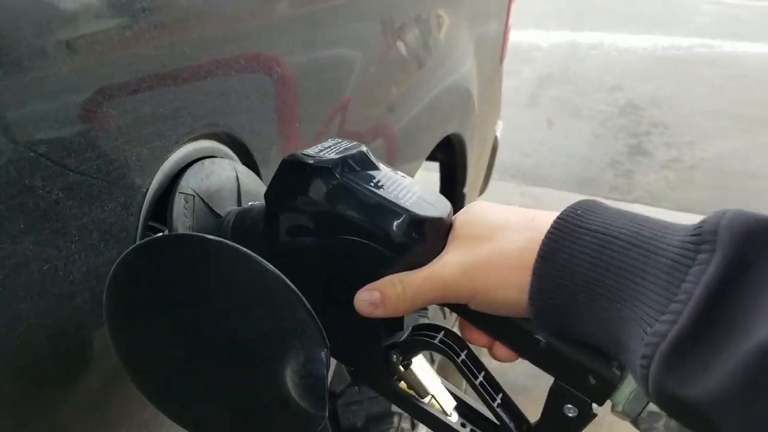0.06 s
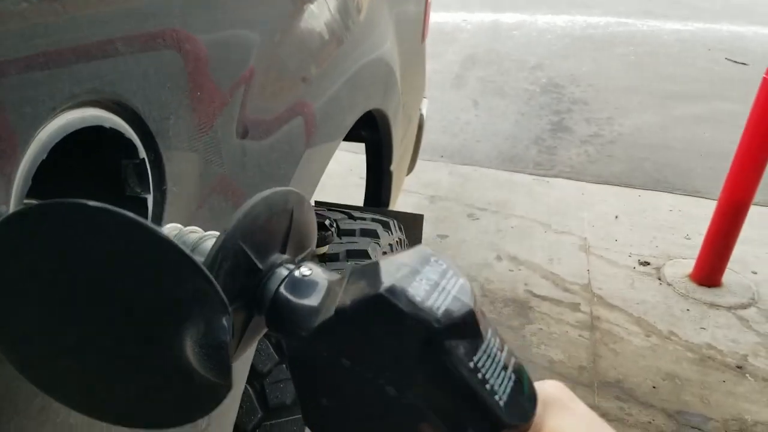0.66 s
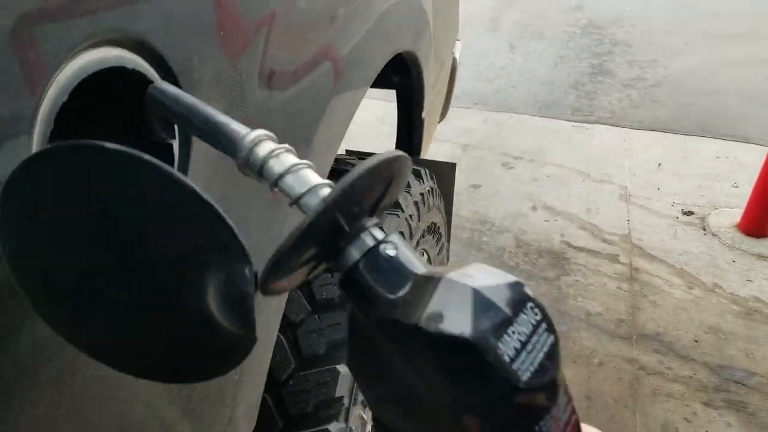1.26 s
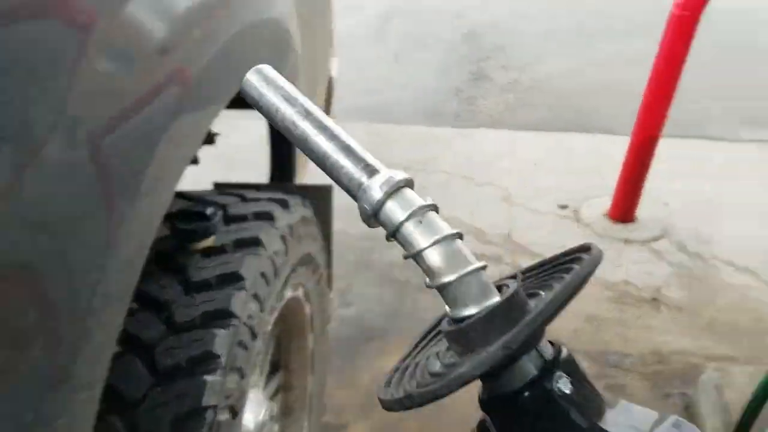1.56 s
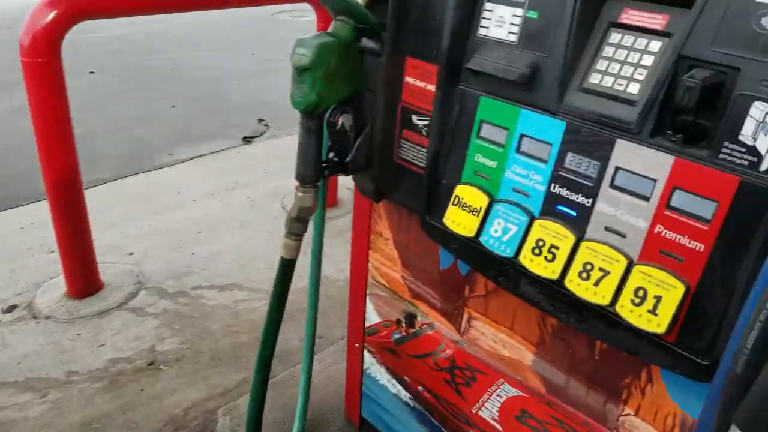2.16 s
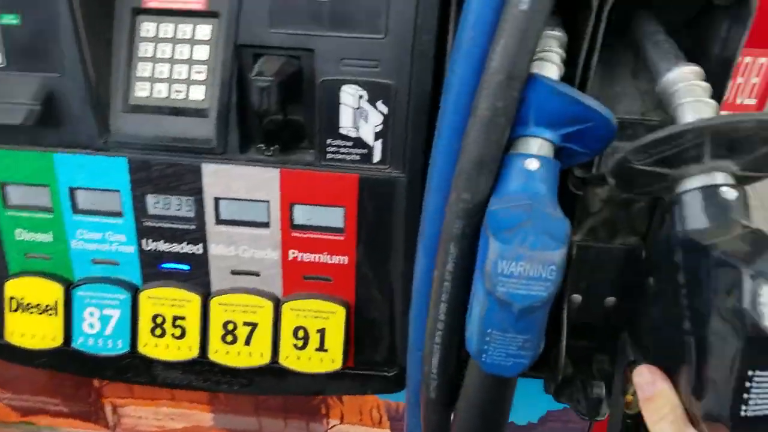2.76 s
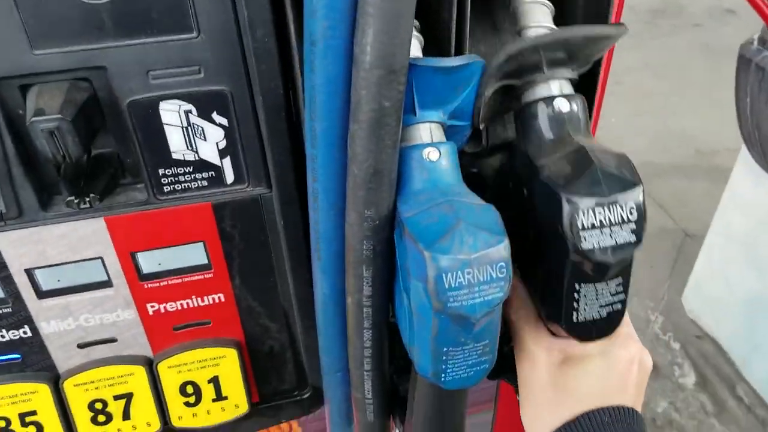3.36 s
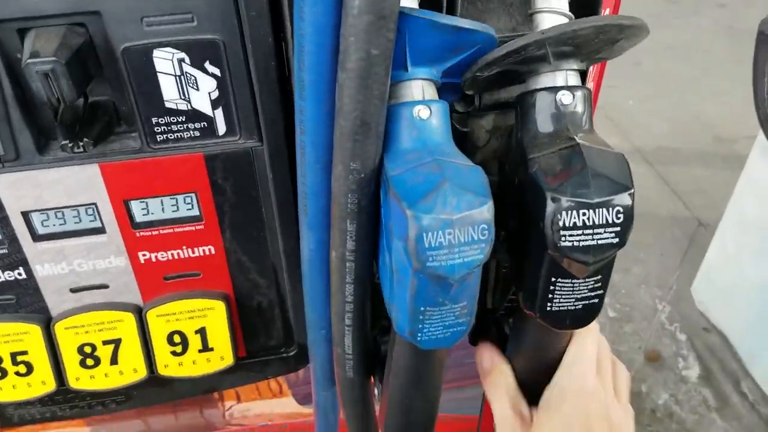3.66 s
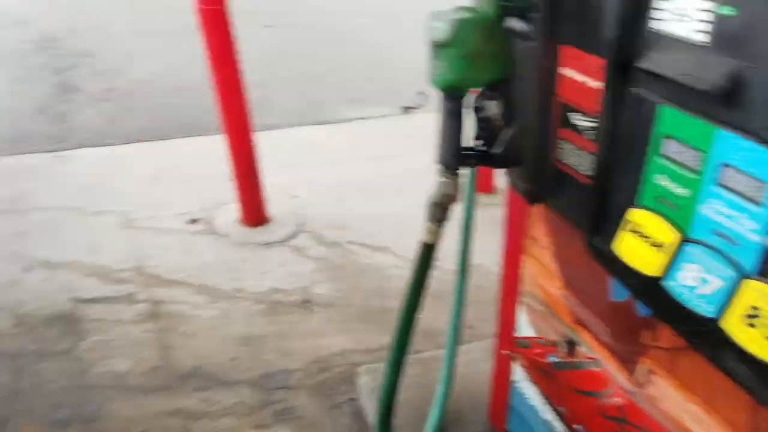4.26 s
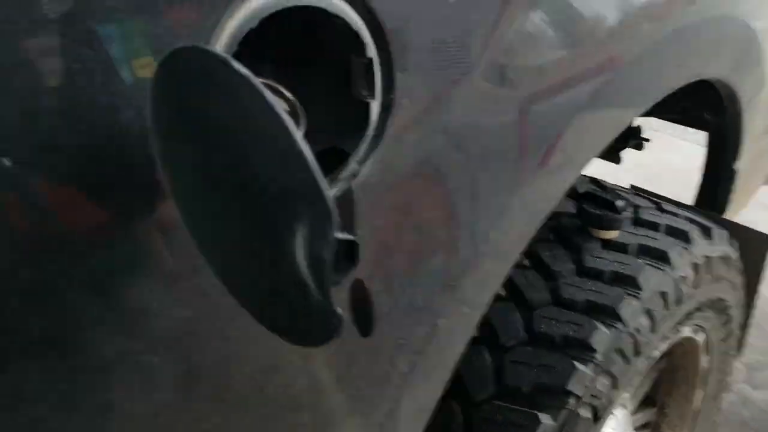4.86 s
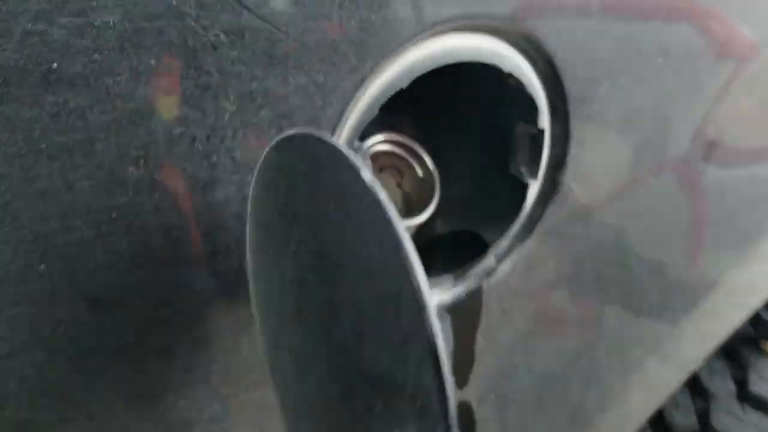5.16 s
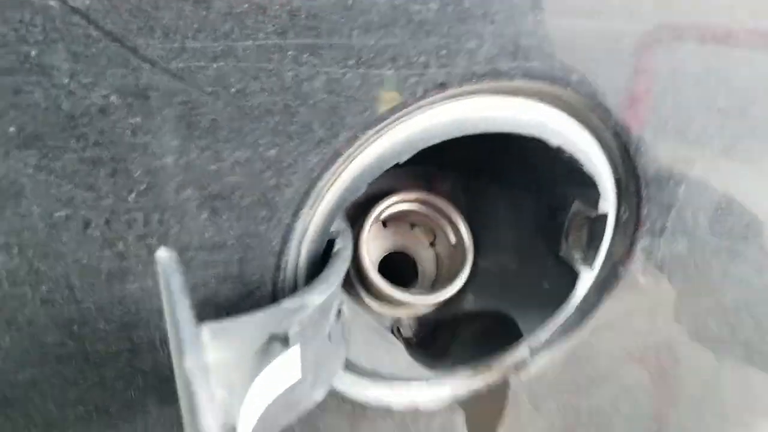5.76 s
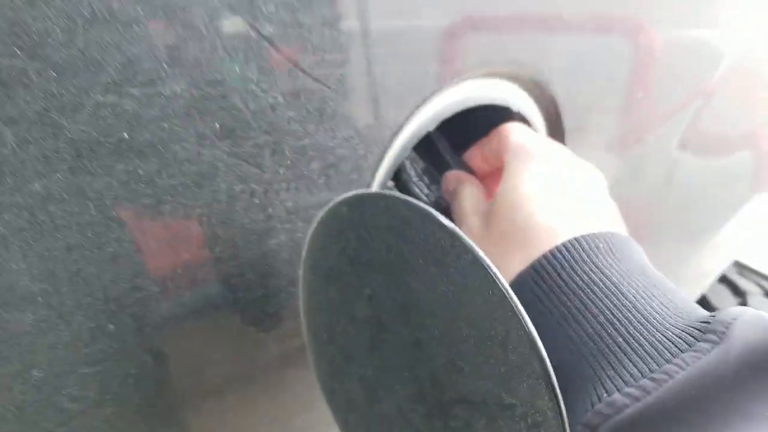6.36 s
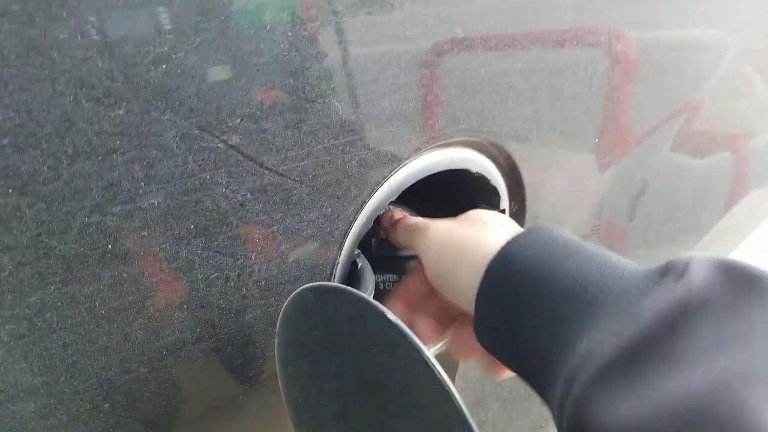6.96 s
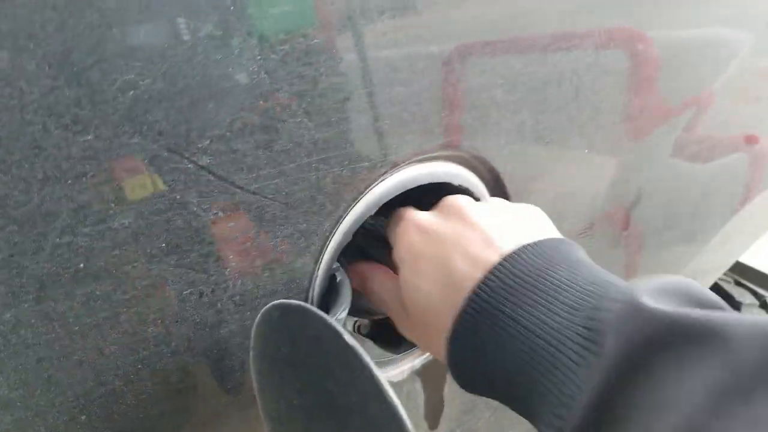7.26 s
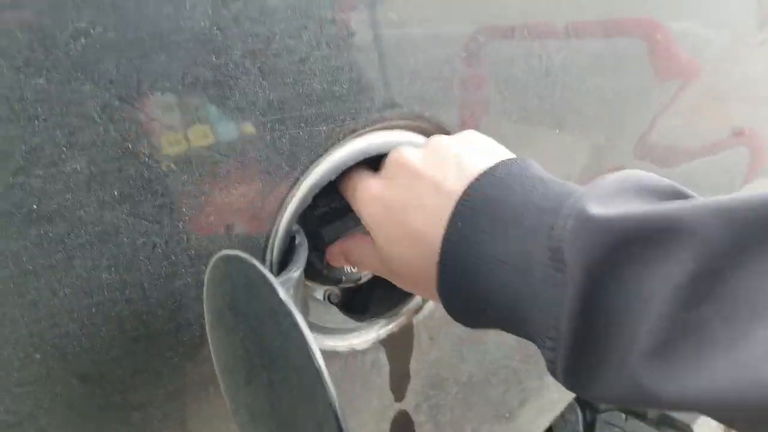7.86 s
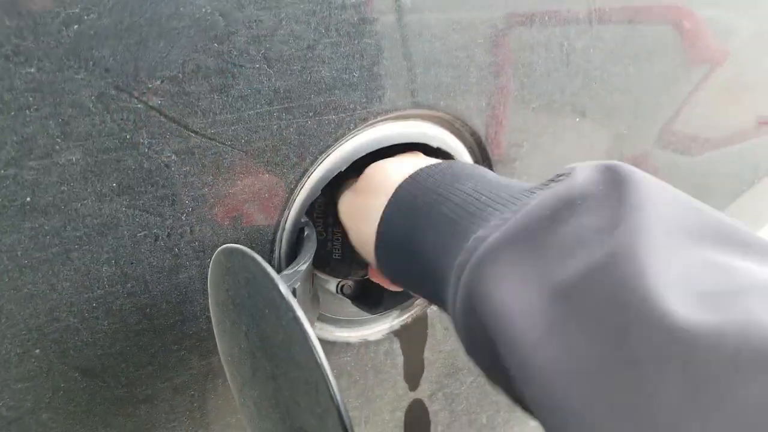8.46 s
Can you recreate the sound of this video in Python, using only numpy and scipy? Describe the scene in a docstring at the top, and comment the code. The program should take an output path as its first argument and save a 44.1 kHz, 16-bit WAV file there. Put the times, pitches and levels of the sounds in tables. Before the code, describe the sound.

A metal fuel nozzle clinks and drags out of a truck's filler neck. A couple of seconds later it clunks several times into the pump's holster, and the cabinet booms. After a few faint, distant squeaks, a hollow plastic cap knocks onto the neck and ticks along its thread. The handling is close, with a short echo from the station canopy, over idling engines and road traffic.

```python
"""A fuel nozzle knocks and drags its way out of a truck's filler neck, and a low drone passes by.
Around three seconds in, the nozzle clunks into the pump's holster and the cabinet booms.
Something squeaks far off; then the plastic fuel cap is seated and ticks along its thread.
Each blow is a crack, a clatter and a few ringing modes, echoed by the forecourt canopy.
Throughout, two engines idle over a wash of road traffic, a high whirr and a faint machine whine."""
import sys
import numpy as np
from scipy import signal
from scipy.fft import rfft, irfft, next_fast_len
from scipy.io import wavfile
from scipy.ndimage import map_coordinates

SR = 44100
rng = np.random.default_rng(int(sys.argv[2]) if len(sys.argv) > 2 else 0)


def int16_out(signal):
    """Quantize to a 16-bit WAV file."""
    q = np.round(np.clip(np.atleast_2d(signal).T, -1, 1) * 32767)
    wavfile.write(sys.argv[1], SR, q.astype(np.int16))


N = 384552

# the spout catches on the neck: start_s, level_db, hardness_db, favoured_hz
SPOUT_HITS = [(0.059, -33, 1.5, 4000), (0.249, -24, 2.5, 5800), (0.253, -28.5, -3, 2510),
              (0.286, -31, -3, 2800), (0.364, -29, 0, 5450), (0.388, -31, -4.5, 2670),
              (0.881, -34.5, 2.5, 918), (0.95, -38, 2.5, 3220)]
# its ring: pitch_hz, level_db, t60_s
SPOUT_MODES = [(248, -5, 0.13), (421, -7, 0.061), (806, -3, .1), (890, 4, 0.093), (2070, -4, 0.15),
               (2740, -3.5, 0.063), (3270, -3.5, 0.038), (3900, -8.5, 0.073), (4040, -10.5, 0.09),
               (4400, -5, .08), (5660, -4.5, 0.02), (6340, -11, .04), (7100, 0.5, .04), (7400, 0.5, 0.039),
               (11400, -9, .03), (12700, -8, .03), (13600, -8.5, 0.033)]
# EQ of its clatter: freq_hz, gain_db
SPOUT_EQ = [(59, -31), (100, 10.5), (210, 0.5), (547, -16), (910, -12.5), (1480, -14), (2130, -14.5),
            (4110, -18), (5530, -17), (6700, -27.5), (7450, -22.5), (8640, -30), (13200, -20),
            (16000, -24.5)]
# two pulls through the hollow neck: start_s, level_db
DRAG_PULLS = [(0.255, -31), (0.375, -30)]
# EQ of the drag: freq_hz, gain_db
DRAG_EQ = [(100, -14.5), (220, 1), (430, -2.5), (600, -7), (1200, -19.5), (4000, -49)]
# pan of knocks and drag: freq_hz, left_minus_right_db
SPOUT_PAN = [(60, -3.5), (240, 1), (950, 1), (3770, 6), (15000, 14.5)]
def spout(drag_t60_s=0.48, drag_attack_s=0.017):
    """The spout and its coiled spring catch on the rim of the filler neck and drag out of it."""
    knocks = contacts(SPOUT_HITS, SPOUT_EQ, SPOUT_MODES,
                      band_t60_s=[0.18, 0.12, 0.12, 0.08, 0.069], band_db=[2, -8.5, -6, -1.5, -11.6],
                      ring_db=0, favour_db=19.5, crack_db=0.5, crack_t60_s=0.0048, pressing=0.61)
    pulls = sum(amp(db) * decay(since(s), drag_t60_s, drag_attack_s) for s, db in DRAG_PULLS)
    drag = pulls * amp(3 * wobble(60)) * noise(DRAG_EQ, CLOSE_WIDTH)
    return panned(knocks + drag, SPOUT_PAN)


# the nozzle bumps into the holster: start_s, level_db, hardness_db, favoured_hz
HOLSTER_HITS = [(2.67, -25, -1.5, 7020), (2.701, -30, -7, 455), (2.948, -24, -4.5, 389),
                (2.959, -21, 5, 1730), (3.021, -17.5, 2, 2530), (3.038, -17.5, 1, 1730),
                (3.185, -31.5, -1, 2740), (3.246, -32.5, -2.5, 1840), (3.338, -16.5, -3.5, 1790),
                (3.35, -21, 1, 2900), (3.385, -14.5, -2, 993), (3.396, -19, 0, 389),
                (3.416, -21.5, 5, 2380)]
# its ring: pitch_hz, level_db, t60_s
NOZZLE_MODES = [(130, 3, 0.052), (198, 6, 0.043), (330.4, -2.5, 0.13), (390, 5, .13), (458, 1, 0.1),
                (778, -7.5, .05), (938, -5, 0.053), (1092, -0.5, 0.036), (1257, -7.5, 0.05),
                (1730, -4.5, 0.032), (2120, -5, .06), (2383, -0.5, 0.042), (2910, -2, 0.042),
                (3760, -16.5, .05), (3940, -7, 0.044), (5179, -13.5, 0.041), (6960, -11, .04)]
# EQ of its clatter: freq_hz, gain_db
NOZZLE_EQ = [(53, -31), (90, 3.5), (201, -9.5), (290, 0), (393, -0.5), (606, -16.5), (998, -26.5),
             (1440, -24.5), (2380, -19.5), (2650, -29), (2950, -21), (6030, -27), (8530, -43), (12600, -32),
             (16000, -34)]
# its weight lands on the cabinet panels: start_s, pitch_hz, level_db, t60_s
CABINET_BOOMS = [(3.021, 126, -4, 0.11), (3.022, 190.3, 3.5, 0.058), (3.399, 83.8, -2, 0.19)]
# pan of knocks and booms: freq_hz, left_minus_right_db
NOZZLE_PAN = [(60, 4), (180, -1), (550, -1), (1650, 0), (4970, 3.5), (15000, 8.5)]
def holster():
    """The heavy nozzle bumps into the pump's boot, then drops onto its rest, and the cabinet booms."""
    knocks = contacts(HOLSTER_HITS, NOZZLE_EQ, NOZZLE_MODES,
                      band_t60_s=[0.069, 0.065, 0.062, 0.04, 0.038], band_db=[-6.5, 0.5, -3, -2.5, -18],
                      ring_db=3, favour_db=16, crack_db=-3.5, crack_t60_s=0.0059)
    for start_s, hz, db, t60_s in CABINET_BOOMS:
        t = since(start_s)
        knocks += amp(db) * decay(t, t60_s, attack_s=0.0011) * np.sin(2 * np.pi * hz * t)
    return panned(knocks, NOZZLE_PAN)


# the cap knocks and ticks on the neck: start_s, level_db, hardness_db
CAP_HITS = [(6.262, -29, 1.5), (6.296, -29, -2), (6.319, -18, -3.5), (6.539, -24.5, -4), (6.816, -24.5, -3),
            (6.892, -23.5, -1), (6.899, -13, -1), (7.046, -24, -0.5), (7.306, -30.5, -6),
            (7.342, -38.5, 14.5), (7.402, -41, 9.5), (7.481, -34, 3), (7.493, -34, 6.5), (7.909, -34.5, 3),
            (8.339, -31.5, 7)]
# its ring: pitch_hz, level_db, t60_s
CAP_MODES = [(292, -10.5, 0.03), (441, -14, 0.12), (657, 4.5, 0.073), (815, -19, 0.078), (964, 10.5, 0.019),
             (1268, 6, 0.035), (1333, -8.5, 0.044), (2013, -7, .03), (3370, -19, 0.0086),
             (4145, -6.5, 0.021), (7180, -18, 0.017)]
# EQ of its clatter: freq_hz, gain_db
CAP_EQ = [(100, -12.5), (300, 12.5), (480, -14.5), (650, 13), (1350, 1.5), (1650, -5.5), (2050, -7.5),
          (3000, -11), (4200, -13.5), (5500, -13.5), (7300, -20.5), (9000, -46), (13000, -39.5),
          (16000, -38)]
# pan of the cap and the rubs: freq_hz, left_minus_right_db
CAP_PAN = [(60, 0.91), (240, 1.0), (950, 1.9), (3770, 2.6), (15000, 18.4)]
def cap(favoured_hz=1330):
    """The hollow plastic cap finds the neck and ticks along its thread."""
    hits = [(*hit, favoured_hz) for hit in CAP_HITS]
    knocks = contacts(hits, CAP_EQ, CAP_MODES,
                      band_t60_s=[0.099, 0.046, 0.034, 0.04, 0.02], band_db=[-14, -12, 0, -10, -28],
                      ring_db=-3, favour_db=9, crack_db=3.5, crack_t60_s=0.0058)
    return panned(knocks, CAP_PAN)


# thud, hollow, knock, clack and tick: low_hz, high_hz
BANDS = [(70, 280), (280, 600), (600, 1500), (1500, 7800), (7800, 16000)]
# a hard blow trades thud for tick, one value a band: gain_db_per_hardness_db
HARDNESS_TILT = [-0.74, -0.94, -0.19, 1, 1.47]
# stereo width of close sounds: freq_hz, left_right_likeness
CLOSE_WIDTH = [(200, 1), (800, 0.77), (3000, 0.21), (12000, 0.28)]
def contacts(hits, eq, modes, band_t60_s, band_db, ring_db, favour_db, crack_db, crack_t60_s,
             pressing=0, light_db=-30, tint_db=5):
    """Each blow sets off a crack, a dying clatter and clear modes in five bands, tilted by hardness."""
    out = np.zeros((2, N + SR))
    t = np.arange(SR // 4) / SR
    mode_hz, mode_db, mode_t60_s = np.transpose(modes)[:, :, None]
    for start_s, db, hardness_db, favoured_hz in hits:
        # where the blow lands decides which mode sings most, and tints the clatter around it
        favour = lambda f, width: np.exp(-(np.log((f + 1) / favoured_hz) / width) ** 2)
        grit = filtered(noise(eq, CLOSE_WIDTH, size=len(t)), lambda f: amp(tint_db * favour(f, 0.19)))
        gain = amp(mode_db + rng.normal(0, 3, mode_hz.shape) + favour_db * favour(mode_hz, 0.06))
        pitch_hz = mode_hz * rng.normal(1, 0.012, mode_hz.shape)  # the changing grip detunes the modes
        ear_phase = rng.uniform(0, 2 * np.pi, mode_hz.shape) + rng.normal(0, 0.46, (2, *mode_hz.shape))
        fades = decay(t, mode_t60_s, attack_s=0.00013 + 0.5 / mode_hz)
        rings = gain * fades * np.sin(2 * np.pi * pitch_hz * t + ear_phase)
        # with pressing, light taps ring freely; heavy ones clamp the parts and mostly clatter
        ring_gain = amp(ring_db - pressing * (db - light_db))
        for (low, high), tilt, t60_s, trim_db in zip(BANDS, HARDNESS_TILT, band_t60_s, band_db):
            attack_s = 0.0001 + 0.81 / low
            envelope = decay(t, t60_s, attack_s) + amp(crack_db) * decay(t, crack_t60_s, attack_s)
            clatter = filtered(grit, lambda f: (f > low) & (f < high)) * envelope
            ring = rings[:, ((mode_hz > low) & (mode_hz <= high))[:, 0]].sum(axis=1)
            blow = unit(unit(clatter) + ring_gain * unit(ring))
            blow *= np.sqrt(0.02 * SR / len(t))  # the energy of 20 ms at rms 1
            out[:, round(start_s * SR):][:, :len(t)] += amp(db + trim_db + tilt * hardness_db) * blow
    return out[:, :N]


# sliding strokes: start_s, end_s, level_db
RUB_STROKES = [(0.054, 0.182, -57), (1.946, 1.975, -46), (2.676, 2.878, -49), (3.544, 3.71, -48.5),
               (4.746, 4.797, -51.5), (6.248, 6.375, -47.5), (7.308, 7.473, -45), (7.742, 7.929, -53),
               (8.193, 8.362, -49)]
# EQ of the friction: freq_hz, gain_db
RUB_EQ = [(800, -24.5), (2500, 2), (6500, 1.5), (8800, -12.5), (13000, -5.5), (16000, -6.5)]
def rubs(grain_db=3.5):
    """Spout, hand and cap thread slide with a fine, grainy hiss."""
    strokes = np.zeros(N)
    for start_s, end_s, db in RUB_STROKES:
        progress = np.minimum(since(start_s) / (end_s - start_s), 1)
        strokes += amp(db) * np.sqrt(np.abs(np.sin(np.pi * progress)))
    friction = unit(noise(RUB_EQ, CLOSE_WIDTH) * amp(grain_db * wobble(250)))
    return panned(strokes * friction, CAP_PAN)


# reverb time under the roof: freq_hz, t60_s
CANOPY_DECAY = [(150, .4), (1000, 0.27), (4000, 0.15), (14000, 0.075)]
def canopy(x, tail_db=-15, slap_db=-20, slap_s=0.032, slap_cutoff_hz=6000):
    """The roof returns one soft slap and a short diffuse tail."""
    hz, t, spectrum = signal.stft(rng.standard_normal((2, SR // 2)), SR, nperseg=256)
    fade = amp(-60 * t / along(CANOPY_DECAY, hz)[:, None])
    impulse = signal.istft(spectrum * fade, SR, nperseg=256)[1]
    impulse = np.pad(impulse / np.linalg.norm(impulse[0]), ((0, 0), (200, 0)))  # 4.5 ms pre-delay
    tail = signal.fftconvolve(x, impulse, axes=1)[:, :N]
    slap = filtered(x, lambda f: np.exp(-2j * np.pi * f * slap_s) / (1 + 1j * f / slap_cutoff_hz))
    return amp(tail_db) * tail + amp(slap_db) * slap


# fader of the deep engine: time_s, level_db
DEEP_FADER = [(0.1, -25.5), (0.19, -22.5), (0.93, -20.5), (1.42, -15), (7.11, -12.5), (8.27, -14.5),
              (8.6, -13)]
# its firing rate sags near the end: time_s, pitch_hz
DEEP_PITCH = [(0, 58.6), (7.5, 58.5), (8.25, 55.3)]
def deep_engine(trim_db=0.5, throb_db=-0.23, hunt_hz=0.198):
    """Only the firing tone of this idling engine carries, hunting a little in pitch."""
    db, = automation(DEEP_FADER)
    hz, = automation(DEEP_PITCH)
    return amp(db + trim_db + throb_db * wobble(11)) * np.sin(phase(hz + hunt_hz * wobble(5.1)))


# the faster engine's firing tone swells: time_s, level_db
FAST_FADER = [(0, -34), (1.5, -27), (5, -26), (6.4, -23.5), (8.72, -24)]
# late on, that tone beats: start_s, rate_hz, depth_db
FIRING_BEAT = (5.1, 1.504, 5.7)
# its overtones: crank_multiple, level_re_firing_db, change_at_pump_db
CRANK_ORDERS = [(6, -17.5, 12), (7, -20.5, 4), (8, -5, -9.5), (10, -19, -9.5), (11, -14.5, -10.5),
                (12, -20, -5.5), (16, -18, -0.5), (24, -34.5, 3.5)]
# the walk to the pump and back: time_s, position (0 at the truck, 1 at the pump)
WALK = [(1.4, 0.19), (2.3, 0.76), (4.1, 1), (4.6, 0.1)]
def fast_engine(firing_hz=80.7, hunt_hz=0.198, flutter_db=2.5):
    """An engine fires four times a turn; the mix of its crankshaft overtones shifts with the walk."""
    firing_db, = automation(FAST_FADER)
    by_pump, = automation(WALK)
    start_s, rate_hz, depth_db = FIRING_BEAT
    crank = phase((firing_hz + hunt_hz * wobble(4)) / 4)
    beat_db = depth_db * np.sin(2 * np.pi * rate_hz * since(start_s))
    hum = amp(firing_db + beat_db) * np.sin(4 * crank)
    for order, db, pump_db in CRANK_ORDERS:
        level_db = firing_db + db + pump_db * by_pump + flutter_db * wobble(7)
        hum += amp(level_db) * np.sin(order * crank + phase(0) + 0.32 * wobble(6))
    return hum


# the pass-by: nearest_s, passing_s, pitch_hz, doppler_swing_hz, level_db
DRONE_PASS = (1, 0.52, 91.5, 2, -29.5)
def passing_drone(octave_db=-6):
    """A low tone and its octave swell and fade, falling in pitch with the Doppler shift."""
    nearest_s, passing_s, hz, swing_hz, db = DRONE_PASS
    past = (since(0) - nearest_s) / passing_s
    turn = phase(hz - swing_hz * np.tanh(past))
    return amp(db) / (1 + past ** 2) * (np.sin(turn) + amp(octave_db) * np.sin(2 * turn))


# road faders (rumble follows roar, whirr follows hiss): time_s, roar_db, hiss_db
TRAFFIC_FADERS = [(0.0, -40.5, -53), (0.85, -45, -54.5), (1.48, -37, -47.5), (1.7, -39.5, -46.5),
                  (2.72, -36, -45.5), (2.89, -35.5, -44), (3.52, -35, -43.5), (4.32, -38.5, -48),
                  (5.56, -36.5, -44), (7.02, -36, -44), (8.72, -35.5, -45)]
# EQs of road rumble, tyre roar and hiss: freq_hz, gain_db
RUMBLE_EQ = [(22, -29.5), (45, 4.5), (75, 7.5), (110, 2.5), (190, 1.5), (270, -4.5), (400, -15.5),
             (520, -54)]
ROAR_EQ = [(220, -58), (380, -0.5), (515, -2.5), (674, -5), (765, 3), (824, -3.5), (969, -4), (1080, -3),
           (1230, -6), (1900, -13.5), (2470, -18.5), (4180, -120)]
HISS_EQ = [(1500, -6.5), (1850, 2), (2700, 3), (3300, -6), (3900, -6.5), (4500, -5.5), (5200, -9.5),
           (6400, -14.5), (7300, -13.5), (8400, -33), (10300, -27), (12500, -15.5), (14500, -18.5),
           (16000, -21)]
# stereo width of distant sounds: freq_hz, left_right_likeness
FAR_WIDTH = [(60, 1), (150, 0.98), (380, 0.71), (950, -0.14), (2380, -0.06), (5980, -0.03), (15000, 0.03)]
def traffic(rumble_db=10, rumble_at_pump_db=-2, roar_db=-1, hiss_db=-1.5):
    """Road noise in three flickering layers; the rumble eases beside the pump."""
    roar_fader, hiss_fader = automation(TRAFFIC_FADERS)
    by_pump, = automation(WALK)
    rumble_fader = roar_fader + rumble_at_pump_db * by_pump
    rumble = amp(rumble_fader + rumble_db + wobble(18)) * noise(RUMBLE_EQ, FAR_WIDTH)
    roar = amp(roar_fader + roar_db + 0.83 * wobble(13)) * noise(ROAR_EQ, FAR_WIDTH)
    hiss = amp(hiss_fader + hiss_db + 0.32 * wobble(20)) * noise(HISS_EQ, FAR_WIDTH)
    return rumble + roar + hiss


# peaky EQ of the whirr: freq_hz, gain_db
WHIRR_EQ = [(2200, -11), (2700, -2.5), (3100, -25), (3900, -20.5), (4450, 1), (5000, -17), (5700, -11),
            (6350, -5), (7200, -19), (7900, -34)]
def whirr(trim_db=-8, flutter_db=3):
    """The running engines give off a high, fluttering noise."""
    _, hiss_fader = automation(TRAFFIC_FADERS)
    return amp(hiss_fader + trim_db + flutter_db * wobble(30)) * noise(WHIRR_EQ, FAR_WIDTH)


# partials of the whine: pitch_hz, level_db
WHINE_TONES = [(522, -57), (785, -49.5), (850, -57), (1105, -53)]
# its fader: time_s, gain_db
WHINE_FADER = [(0, -9), (1.45, 4.5), (1.9, 0.5), (5.4, 1.5), (6.4, 7), (8.72, -1)]
def whine(waver_hz=3.52, flutter_db=2):
    """A machine's faint tones waver in pitch and level, separately in each ear."""
    fader_db, = automation(WHINE_FADER)
    tones = np.zeros((2, N))
    for hz, db in WHINE_TONES:
        for ear in tones:
            gain = 2 * amp(db + fader_db + flutter_db * wobble(20))
            ear += gain * np.sin(phase(hz + waver_hz * wobble(45)))
    return tones


def squeaks(start_s=5.31, period_s=0.15, count=6, width_s=0.016, pitch_hz=2700, level_db=-50):
    """Something across the forecourt chirps in short, rough pulses."""
    t = since(0)
    pulses = sum(np.exp(-((t - start_s - k * period_s) / width_s) ** 2) for k in range(count))
    narrow_eq = [(pitch_hz / 2, -90), (pitch_hz, 0), (2 * pitch_hz, -90)]
    return amp(level_db) * pulses * noise(narrow_eq, FAR_WIDTH)


def amp(db):
    """Decibels to gain."""
    return 10 ** (np.asarray(db) / 20)


def unit(x):
    """Scaled to rms 1; a stereo pair by its middle."""
    return x / np.sqrt(np.mean(np.atleast_2d(x).mean(axis=0) ** 2) + 1e-20)


def since(start_s):
    """Seconds since a moment, zero before it."""
    return np.maximum(np.arange(N) / SR - start_s, 0)


def decay(t, t60_s, attack_s):
    """A quick rise and an exponential fall."""
    return (1 - np.exp(-t / attack_s)) * amp(-60 * t / t60_s)


def along(points, hz):
    """Reads (freq_hz, value) points on a log axis."""
    freqs, values = np.transpose(points)
    return np.interp(np.log(hz + 1), np.log(freqs + 1), values)


def automation(rows):
    """One value per sample for each column after the time."""
    times, *columns = np.transpose(rows)
    return [np.interp(since(0), times, column) for column in columns]


def wobble(rate_hz):
    """A smooth random curve through rate_hz knots a second."""
    coarse = np.arange(0, N, 64)
    knots = rng.standard_normal(int(N * rate_hz / SR) + 4)
    return np.interp(np.arange(N), coarse, map_coordinates(knots, [coarse * rate_hz / SR]))


def phase(hz):
    """Running phase of a moving frequency, from a random start."""
    return 2 * np.pi * (np.cumsum(hz) / SR + rng.random())


def filtered(x, response):
    """Shapes x by a frequency response."""
    size = x.shape[-1]
    padded = next_fast_len(size + 4096)
    return irfft(rfft(x, padded) * response(np.fft.rfftfreq(padded, 1 / SR)), padded)[..., :size]


def panned(x, pan):
    """Each frequency leans to one side."""
    return filtered(x, lambda hz: amp(np.outer([0.5, -0.5], along(pan, hz))))


def noise(eq, likeness, size=N):
    """Coloured stereo noise of rms 1, partly alike in the two ears."""
    def mid_side_gains(hz):
        spread = np.arccos(np.clip(along(likeness, hz), -0.9, 1)) / 2
        return amp(along(eq, hz)) * [np.ones_like(hz), np.tan(spread)]
    mid, side = filtered(rng.standard_normal((2, size)), mid_side_gains)
    return unit(np.array([mid + side, mid - side]))


# pan of traffic, whirr and whine: freq_hz, left_minus_right_db
FAR_PAN = [(60, 12.5), (150, 3), (380, -3), (950, 0), (2380, 0.5), (5980, 6.5), (15000, 5.5)]
def scene():
    """Close handling noises and their echo over the forecourt's hum."""
    close = spout() + holster() + cap() + rubs()
    echo = canopy(close)
    engines = deep_engine() + fast_engine() + passing_drone()
    engines = np.sqrt(2) * engines * amp([[0.6], [-0.6]])  # slightly left
    wash = panned(traffic() + whirr() + whine(), FAR_PAN)
    return close + echo + engines + wash + squeaks()


def record(dry, top_hz=15950):
    """The loudest clunks flatten at full scale; nothing passes above the band limit."""
    clipped = dry / (1 + np.abs(dry) ** 8) ** (1 / 8)
    return filtered(clipped, lambda hz: hz < top_hz)


dry = scene()
out = record(dry)
int16_out(out)
```